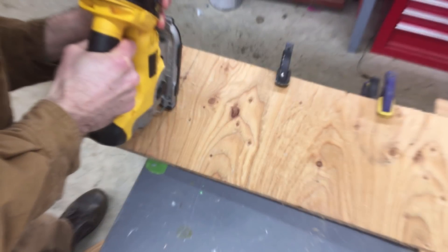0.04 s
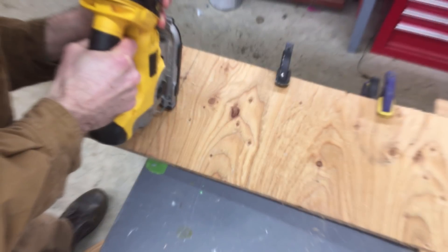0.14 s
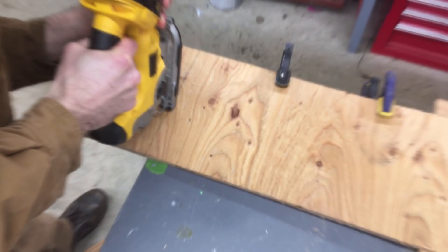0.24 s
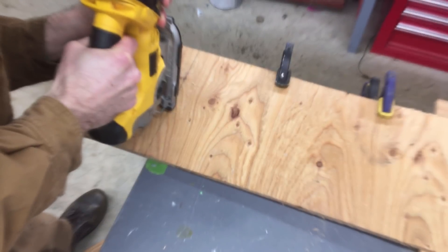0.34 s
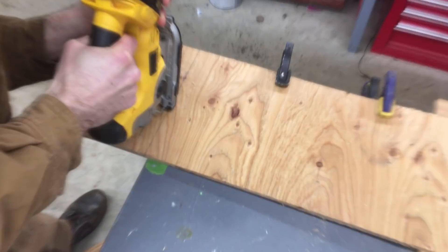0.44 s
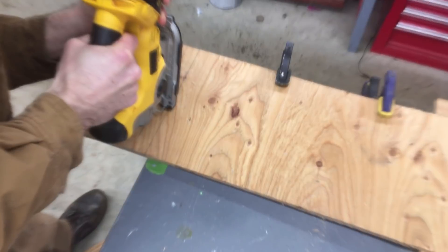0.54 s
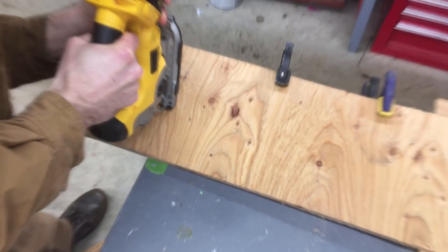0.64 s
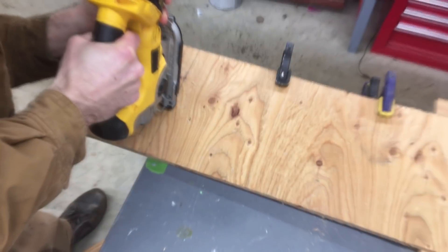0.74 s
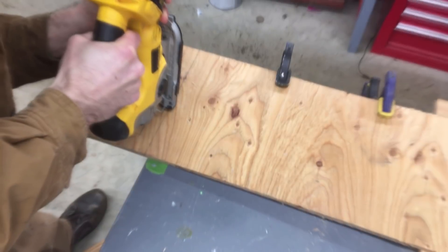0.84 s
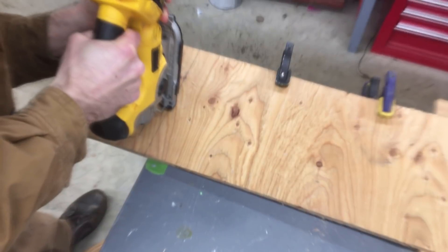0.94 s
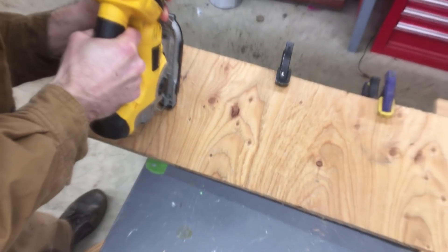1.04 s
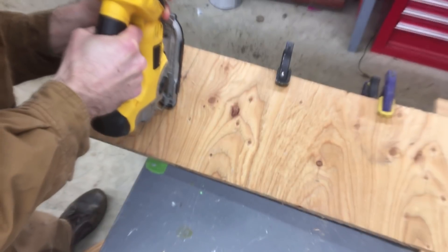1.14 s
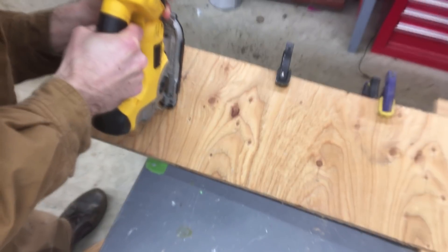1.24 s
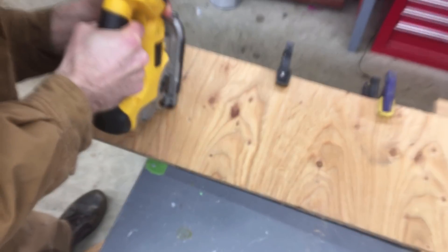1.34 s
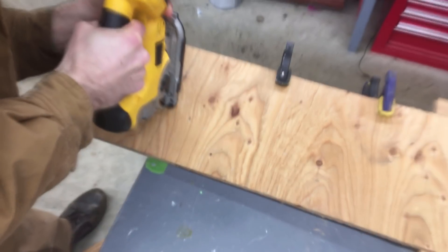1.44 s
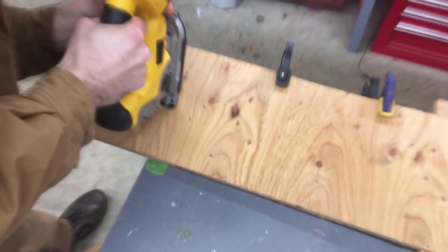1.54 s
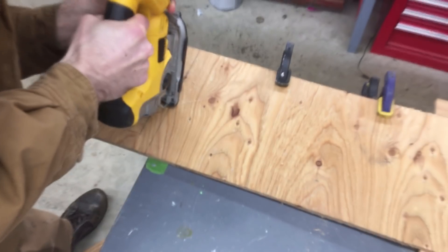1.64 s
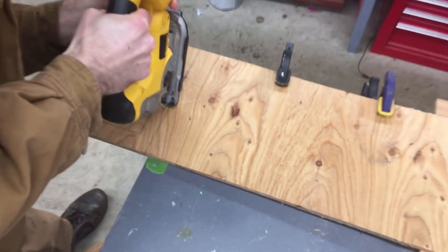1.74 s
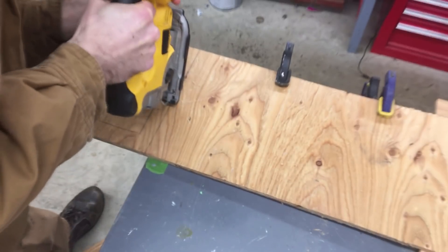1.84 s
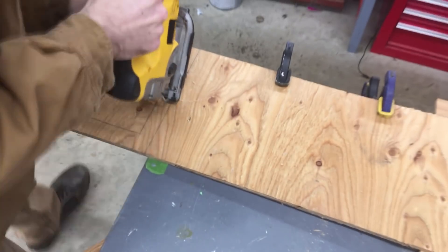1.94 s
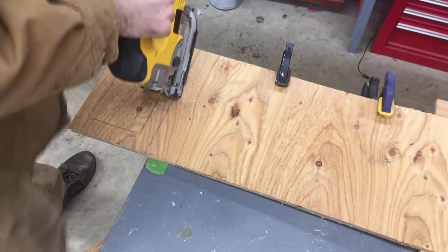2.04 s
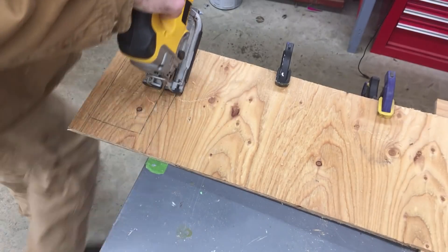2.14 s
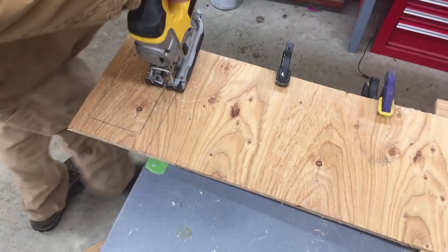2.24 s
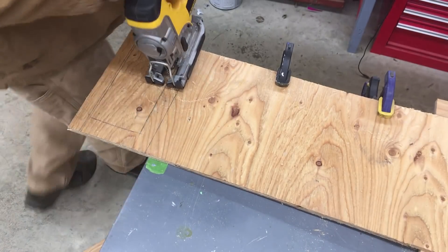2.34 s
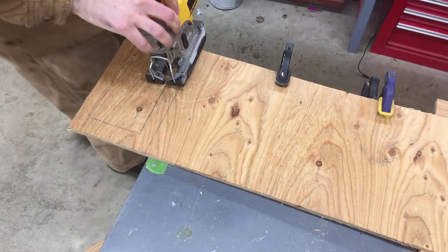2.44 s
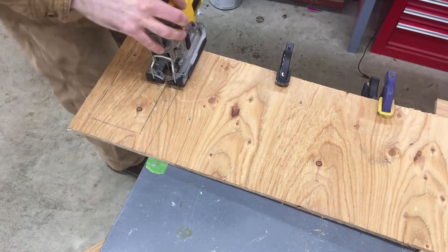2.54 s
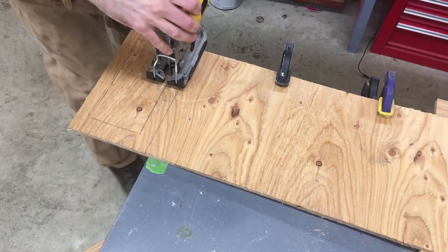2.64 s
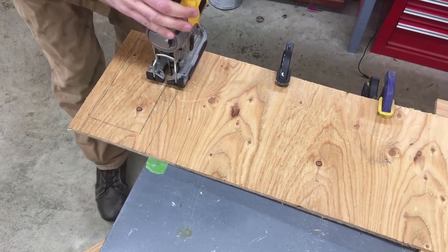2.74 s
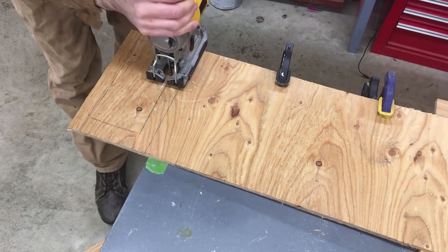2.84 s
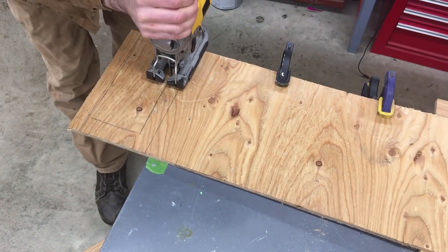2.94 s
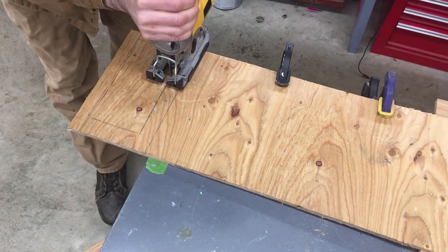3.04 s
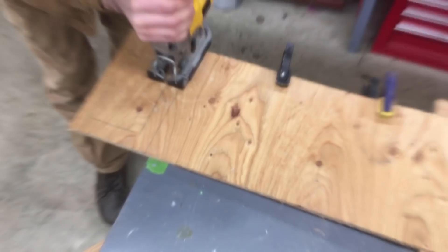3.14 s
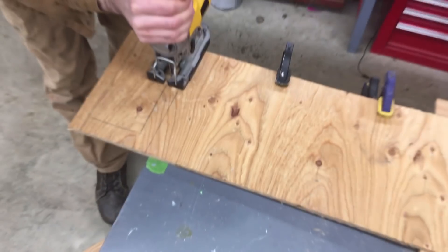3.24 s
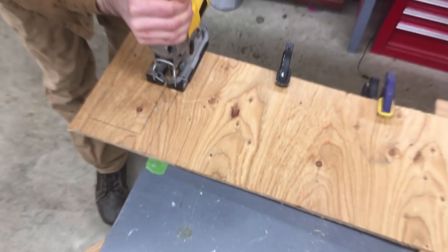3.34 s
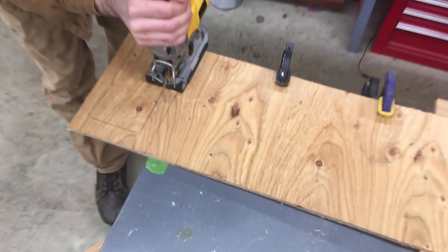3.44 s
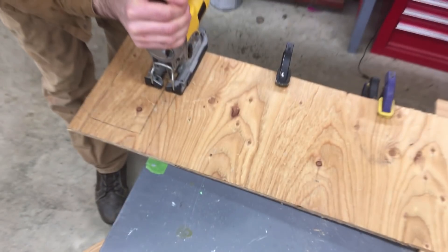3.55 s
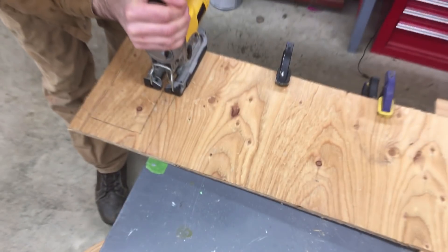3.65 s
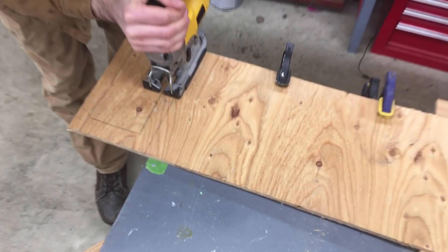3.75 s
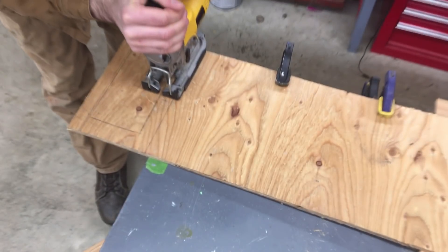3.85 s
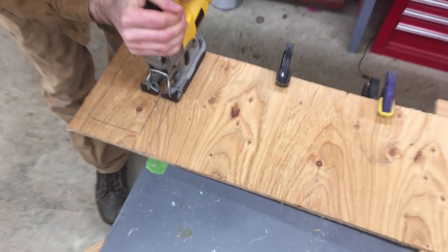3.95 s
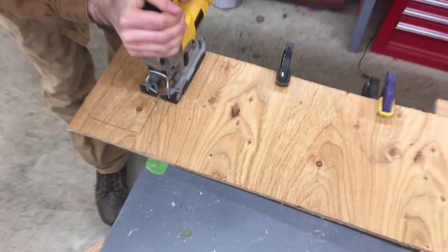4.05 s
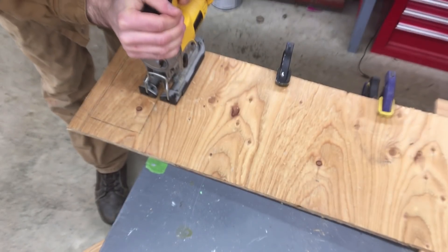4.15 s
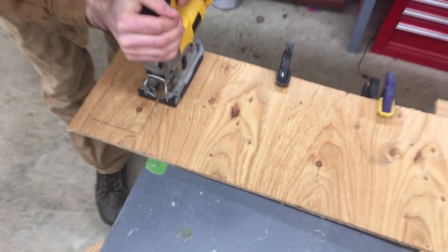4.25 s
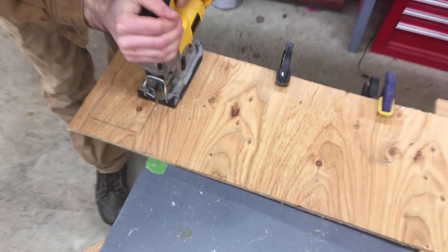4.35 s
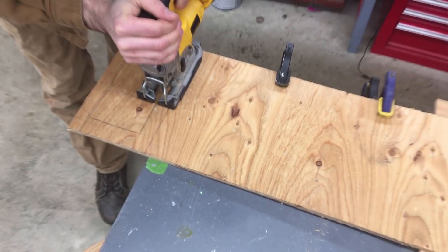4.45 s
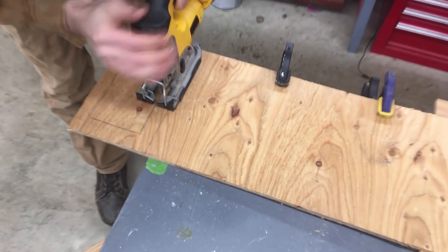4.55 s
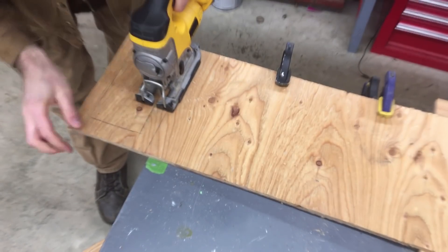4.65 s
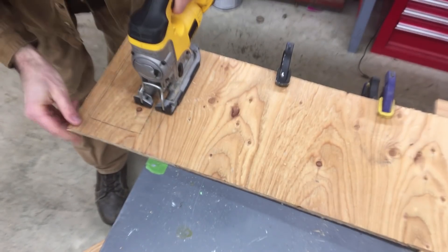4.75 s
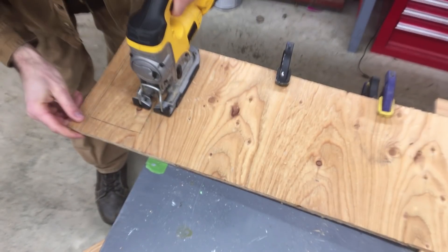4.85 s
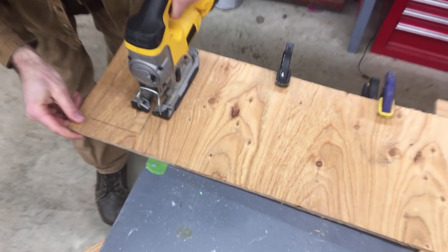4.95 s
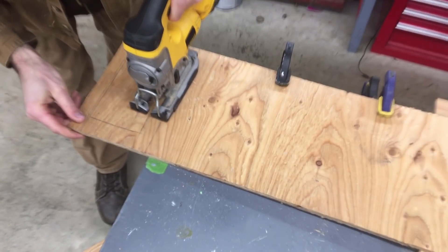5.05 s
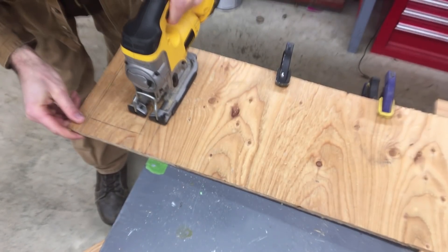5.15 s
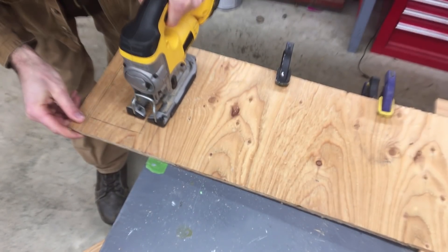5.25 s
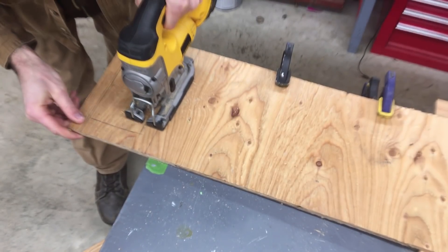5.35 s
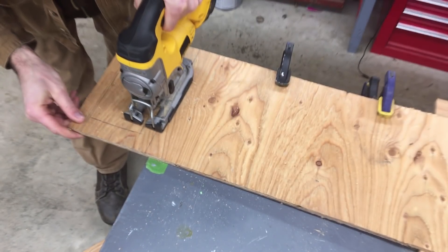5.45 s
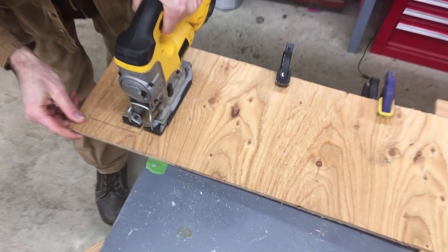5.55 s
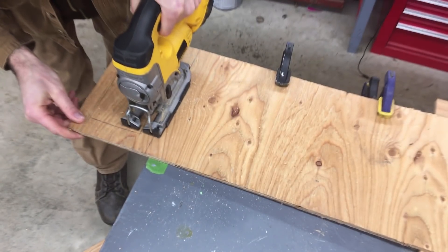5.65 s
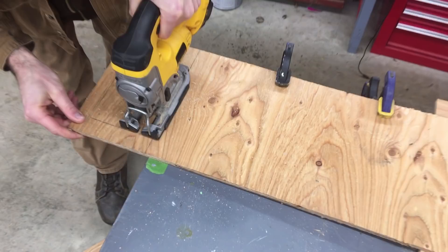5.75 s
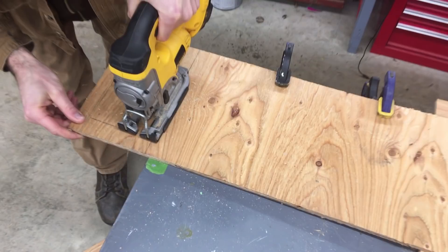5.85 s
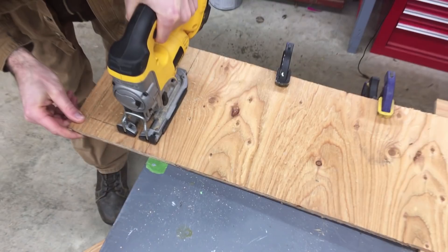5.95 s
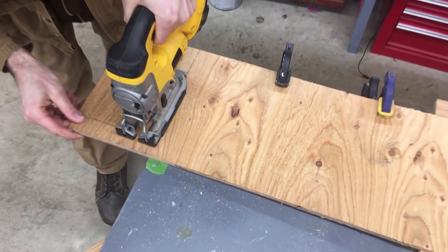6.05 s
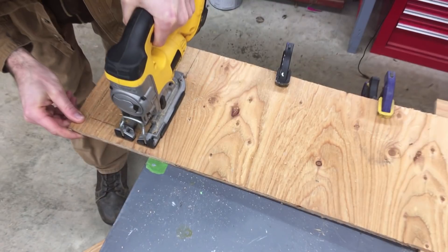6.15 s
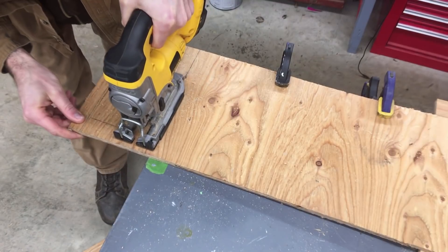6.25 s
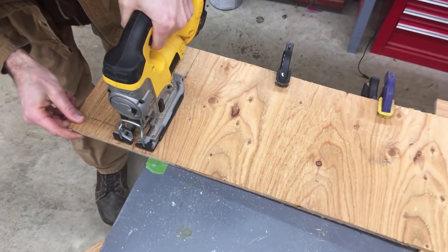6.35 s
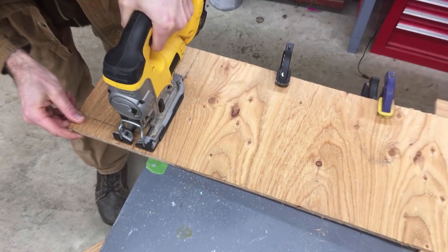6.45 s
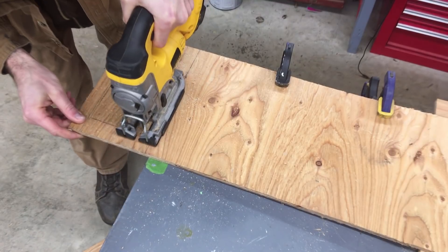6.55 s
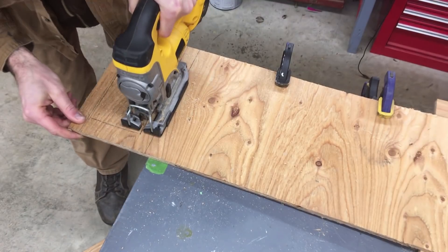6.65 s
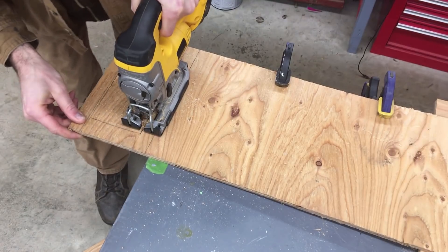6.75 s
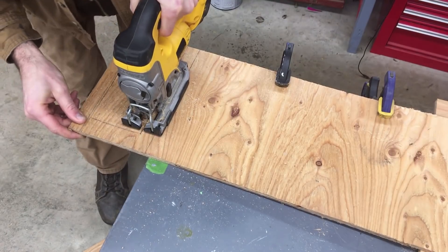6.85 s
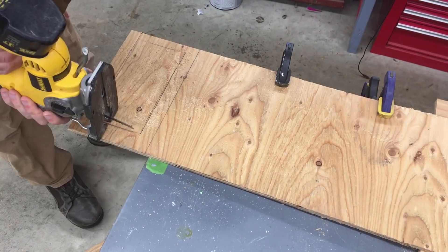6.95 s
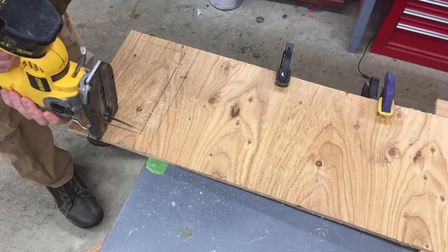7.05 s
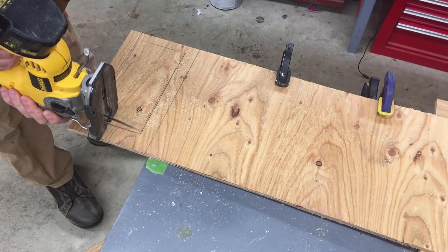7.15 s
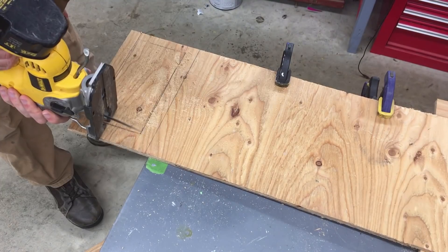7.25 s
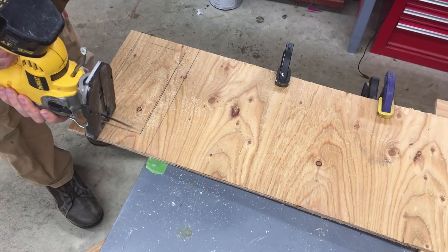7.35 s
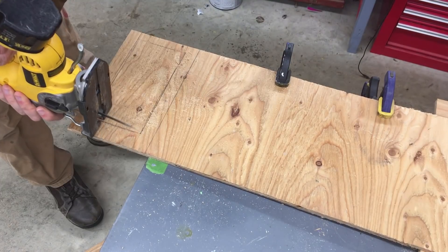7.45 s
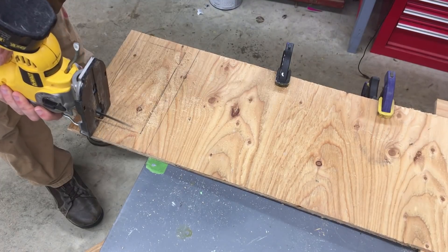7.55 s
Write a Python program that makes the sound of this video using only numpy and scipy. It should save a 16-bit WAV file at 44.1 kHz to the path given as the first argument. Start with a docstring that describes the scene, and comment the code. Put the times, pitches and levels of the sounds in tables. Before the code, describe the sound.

A cordless jigsaw buzzes through clamped plywood in two runs, with knocks and shuffling between, then whirs briefly in the air in a workshop.

```python
"""In a workshop a cordless jigsaw makes three short runs, two of them through a clamped plywood board.
Harmonics of the stroke rate make the hum; bursts of grainy noise make the teeth biting the wood.
Stroke jolts and teeth drive resonators, the ringing parts; shaped noise makes gears and fan whirr on.
Between the runs the saw is shifted on the board: decaying rings make ticks and knocks, noise the rustle.
Decaying bands of noise give the room's echo."""
import sys
import numpy as np
from scipy import signal
from scipy.fft import rfft, irfft
from scipy.io import wavfile
from scipy.ndimage import uniform_filter1d

SR = 44100
rng = np.random.default_rng(int(sys.argv[2]) if len(sys.argv) > 2 else 0)


def volts_from_decibels(level):
    """Turn decibel levels (scalar or array-like) into linear amplitude factors."""
    exponent = np.asarray(level, float) / 20
    return 10 ** exponent


def transcribe(u):
    """Save the signal u as a 16-bit wav file named by the first command-line argument.

    u: samples, shape (n,) or (channels, n), limited to [-1, 1]; the rate is SR.
    q: integer samples, one column per channel.
    """
    v = np.clip(np.atleast_2d(u).T, -1, 1)
    q = np.round(v * 32767).astype(np.int16)
    wavfile.write(sys.argv[1], SR, q)


N = 335160


def rms_one(x):
    """Normalisation: equal mean power, whatever the waveform."""
    return x / np.sqrt(np.mean(x ** 2) + 1e-20)


def in_time(rows):
    """Envelopes: each column is interpolated linearly over the t/s of the first."""
    s, *columns = np.transpose(rows)
    return [np.interp(np.arange(N) / SR, s, c) for c in columns]


def at_hz(points, hz):
    """Spectral interpolation: straight lines over the logarithm of frequency."""
    f, value = np.transpose(points)
    return np.interp(np.log(hz), np.log(f), value)


def drift(rate):
    """Random modulation: chance values, rate per second, joined by lines; spread about 1."""
    count = int(N * rate // SR) + 2
    values = rms_one(rng.standard_normal(count)) * np.sqrt(3 / 2)   # the lines lose a third of the power
    return np.interp(np.arange(N) * (rate / SR), np.arange(count), values)


def coloured(x, spectrum):
    """Spectral shaping: weights x by level over frequency, then sets its rms to 1."""
    hz = np.maximum(np.fft.rfftfreq(N, 1 / SR), 10)
    return rms_one(irfft(rfft(x) * volts_from_decibels(at_hz(spectrum, hz)), N))


def bandpass(x, low, high):
    """Band limitation: passes what lies between two frequencies."""
    return signal.sosfilt(signal.butter(2, [low, high], "band", fs=SR, output="sos"), x)


def resonance(x, hz, width_hz):
    """Damped resonance: one pole pair, whose bandwidth sets the decay."""
    r = np.exp(-np.pi * width_hz / SR)
    a = [1, -2 * r * np.cos(2 * np.pi * hz / SR), r * r]
    return signal.lfilter([(1 - r * r) / 2, 0, (r * r - 1) / 2], a, x)


def switched(spans, start_s, stop_s):
    """Gating: 1 inside the spans, with a ramp at either end, but none at a start at 0."""
    t = np.arange(N) / SR
    ramps = [np.minimum((t - a) / start_s + (a == 0), (b - t) / stop_s + 1) for a, b in spans]
    return sum(np.clip(ramp, 0, 1) for ramp in ramps)


def peak(at_s, rise_s, fall_s):
    """Triangular envelope: from 0 up to 1 at the given moment, and down to 0."""
    return np.interp(np.arange(N) / SR, [at_s - abs(rise_s), at_s, at_s + abs(fall_s)], [0, 1, 0])


def swell(at_s, db, rise_s, fall_s):
    """Exponential growth and decay: the gain climbs 40 dB to its peak and falls away again."""
    tent = peak(at_s, rise_s, fall_s)
    return volts_from_decibels(db + 40 * (tent - 1)) * (tent > 0)


# reverberation time of the workshop: f/Hz, time to fall 60 dB/s
REVERBERATION = [(100, 1), (1000, 0.59), (1900, 0.39), (3800, 0.45), (6000, 0.45), (14000, 0.23)]


def workshop(x):
    """Diffuse reverberation: half-octave bands of noise, each dying at its own rate."""
    t, edges = np.arange(SR) / SR, 60 * 2.0 ** np.arange(0, 8.1, .5)
    tail = 0
    for low, high in zip(edges, edges[1:]):
        band = bandpass(rng.standard_normal(SR), low, high)
        t60 = at_hz(REVERBERATION, np.sqrt(low * high))
        decay = volts_from_decibels(-60 * t / t60) * np.minimum(t / 0.007, 1)
        tail = tail + band * decay / np.sqrt(np.sum(decay ** 2))
    return signal.fftconvolve(x, tail)[:N]


# level of the rustle in the pauses, before its flutter: t/s, level/dB
RUSTLE_LEVEL = [(2.16, -69), (2.225, -69.5), (2.28, -78), (2.394, -74.5), (2.416, -74.5), (2.71, -78.5),
                (2.735, -75), (2.78, -83), (2.83, -76), (2.9, -84.5), (3.05, -90.5), (6.78, -85),
                (6.97, -98)]
# spectrum of the rustle: f/Hz, level per Hz/dB
RUSTLE_SPECTRUM = [(290, -17.5), (863, -1), (2360, -1.5), (5830, -7), (13200, -15.5), (15500, -22.5)]
# the saw is dragged over the wood: t/s, rumble level/dB, rub level/dB, fall of the rumble/s
DRAGS_ON_WOOD = [(2.222, -71, -76, 0.28), (2.5, -75, -77, 0.61)]
DRAG_RISE_S, RUB_FALL_S, RUMBLE_FLOOR_DB = 0.23, 0.26, -85


def shuffle():
    """Friction noise: lumpy rumble, dull rubbing and grainy rustle of hands, feet and shoe on wood."""
    rumble_gain = volts_from_decibels(RUMBLE_FLOOR_DB)
    rumble_gain = rumble_gain + sum(swell(s, db, DRAG_RISE_S, fall) for s, db, _, fall in DRAGS_ON_WOOD)
    rub_gain = sum(swell(s, db, DRAG_RISE_S, RUB_FALL_S) for s, _, db, _ in DRAGS_ON_WOOD)
    rumble = bandpass(rng.standard_normal(N), 80, 260)
    rub = bandpass(rng.standard_normal(N), 300, 720)
    grains = rng.standard_normal(N) * volts_from_decibels(2.1 * rng.exponential(1, N))
    rustle = coloured(grains, RUSTLE_SPECTRUM)
    dull = rumble_gain * rms_one(rumble) + rub_gain * rms_one(rub)
    rustle_gain = volts_from_decibels(in_time(RUSTLE_LEVEL)[0] + 2.3 * drift(30.27))
    return volts_from_decibels(2.7 * drift(32)) * dull + rustle_gain * rustle


# ticks and knocks of the handled saw: t/s, tick level/dB, low knock level/dB, main ring f/Hz, ring width/Hz
HANDLING_TAPS = [(2.212, -54, -64, 3401, 700), (2.417, -50, -82, 3900, 300),
                 (2.418, -49.5, -97.5, 5000, 350), (2.447, -53, -71.5, 2330, 1200),
                 (2.5, -61, -69.5, 1330, 300), (2.529, -59, -67.5, 520, 150), (2.586, -54, -82, 4500, 3000),
                 (2.625, -62, -75, 2190, 300), (2.725, -57, -79, 6300, 1300), (2.797, -57, -83, 3300, 700),
                 (2.826, -61.5, -76, 6600, 700), (2.854, -61, -71, 3480, 1500), (2.96, -65, -88, 2100, 600),
                 (3.111, -19.5, -47, 1320, 100), (6.59, -31, -65, 848, 250), (6.806, -57, -84, 3273, 700),
                 (6.981, -63.5, -86, 1500, 500), (7.054, -36, -75, 1520, 50), (7.079, -29, -78, 3748, 250)]
# modes of the knocked board: f/Hz, level against the knock/dB, time to fall 60 dB/s
BOARD_MODES = [(119, -4.5, 0.51), (224, -1, 0.12), (336, -4, 0.14), (506, -8, 0.14)]
CRACK_FALL_S, KNOCK_RISE_S = 0.0037, 0.0033


def taps():
    """Impact excitation: a short dry crack, a ring at its own pitch, and a soft push into the board."""
    out, t = np.zeros(N), np.arange(SR // 4) / SR
    noises = rng.standard_normal((len(HANDLING_TAPS), len(t)))
    for (s, tick_db, knock_db, ring_hz, width_hz), noise in zip(HANDLING_TAPS, noises):
        crack = noise * np.exp(-t / CRACK_FALL_S)
        ring = resonance(crack, ring_hz, width_hz)
        tick = 0.2 * resonance(crack, 1.8 * ring_hz, 2.1 * ring_hz) + 0.65 * ring / np.abs(ring).max()
        knock = 0
        for k, (hz, db, t60) in enumerate(BOARD_MODES):
            knock = knock + volts_from_decibels(db - 60 * t / t60) * np.sin(2 * np.pi * hz * t + noise[k])
        knock = knock * (1 - np.exp(-t / KNOCK_RISE_S))
        at = round(s * SR)
        out[at:at + len(t)] += (volts_from_decibels(tick_db) * tick + volts_from_decibels(knock_db) * knock)[:N - at]
    return out


# soft starts: t of the trigger/s, time until the drive takes hold/s
SOFT_STARTS = [(3.062, 0.057), (6.989, 0.027)]
# stops: t at rest/s, braking time/s
BRAKED_STOPS = [(1.94, 0.0068), (6.64, 0.049)]
CREEP_FROM_DB, CREEP_TO_DB, BRAKE_DB = -15, -4.5, -11.5


def trigger():
    """Motor transients: dB lost in a start's creep, which ends in a jump, and in braking."""
    t = np.arange(N) / SR
    creep = sum(np.interp(t, [s, s + hold], [CREEP_FROM_DB, CREEP_TO_DB], 0, 0) for s, hold in SOFT_STARTS)
    return creep + BRAKE_DB * sum(peak(s, braking, .3) for s, braking in BRAKED_STOPS)


# the runs, while the trigger is held: from t/s, to t/s
TRIGGER_HELD = [(0, 1.94), (3.06, 6.64), (6.991, 7.6)]
# first harmonic of the hum, against the hum level: t/s, level/dB
FIRST_HARMONIC = [(0, -14.5), (1.63, -17), (1.68, -22), (1.92, -10), (3.2, -13.5), (4.9, -11.5),
                  (6.2, -23.5), (6.4, -9.5), (7.15, -18), (7.6, -18)]
HIGHER_DB = [-56.5, -52, -65]   # base level of the higher harmonics in each run
HIGHER_FOLLOWS, HUM_REF_DB, RATTLE_LIFT_DB = 0.32, -54, 5   # share of the hum's swing about the reference


def hum_levels(hum_db, lead_db, rattle):
    """Power sum: third and fourth harmonics share the hum level; also dB of the first and the higher."""
    run = np.searchsorted([a for a, b in TRIGGER_HELD], np.arange(N) / SR, "right") - 1
    higher_db = np.take(HIGHER_DB, run) + HIGHER_FOLLOWS * (hum_db - HUM_REF_DB)
    higher_db = higher_db + RATTLE_LIFT_DB * rattle + trigger()
    third_db = hum_db - 10 * np.log10(1 + volts_from_decibels(-2 * lead_db))
    return hum_db + in_time(FIRST_HARMONIC)[0], third_db, third_db - lead_db, higher_db


# harmonics 5 to 14 of the hum, against the higher-harmonic level: level/dB each;
# one row for the first cut, one for all that follows
UPPER_HARMONICS = [
    [-9.5, -7, -5, -8.5, -13, -8, -15, -10.5, -17.5, -6],
    [-20.5, -19.5, -13.5, -20.5, -10.5, -15.5, -24, -7.5, -10.5, -9],
]
# the fifth harmonic swells as the blade first bites: t/s, lift/dB, rise/s, fall/s
FIFTH_LIFT = (3.27, 14, 0.14, 0.46)
# motor shaft, before its waver: t/s, tone level/dB, octave level/dB
SHAFT_TONES = [(1.9, -74.5, -68.5), (3.1, -83, -78.5), (3.3, -75, -57), (4.7, -69.5, -58), (5.3, -64, -63),
               (6.2, -59, -62), (6.44, -52.5, -55), (6.52, -55, -81), (7.05, -85, -80), (7.075, -75, -51),
               (7.12, -61.5, -60), (7.36, -69, -59), (7.42, -60, -78), (7.6, -66, -81)]
# thin high whine, before its waver: t/s, level/dB
WHINE_LEVEL = [(1.9, -83), (3.1, -73), (4.8, -57), (6.4, -66), (7.1, -64.5)]
SHAFT_TURNS, WHINE_ORDER = 7.11, 27   # motor turns per stroke; whine cycles per motor turn


def hum(turns, rattle, first_db, third_db, fourth_db, higher_db):
    """Harmonic series: the board hums at multiples of the stroke rate, each wavering; shaft tones join."""
    second_cut = np.arange(N) > 2.5 * SR
    higher = [higher_db + np.where(second_cut, b, a) + 2.0 * drift(5) for a, b in zip(*UPPER_HARMONICS)]
    s, lift_db, rise, fall = FIFTH_LIFT
    higher[0] = higher[0] + lift_db * peak(s, rise, fall)
    out = 0
    for k, db in enumerate([first_db, first_db + 0.5, third_db, fourth_db] + higher, 1):
        waver = 0.42 * drift(9) + 2.0 * rattle * drift(40)
        tone = np.sin(2 * np.pi * (k * turns + rng.random()) + waver)
        out = out + volts_from_decibels(db + 2.07 * drift(16)) * tone
    shaft_phase = 2 * np.pi * SHAFT_TURNS * turns
    whine = np.sin(WHINE_ORDER * shaft_phase + 1.2 * drift(250))
    out = out + volts_from_decibels(in_time(WHINE_LEVEL)[0] + 2.5 * drift(15)) * whine
    tone_db, octave_db = in_time(SHAFT_TONES)
    shaft = shaft_phase + 3.9 * rattle * drift(40)
    out = out + volts_from_decibels(tone_db + 1.2 * drift(12)) * np.sin(shaft)
    out = out + volts_from_decibels(octave_db + 1.7 * drift(14)) * np.sin(2 * shaft)
    return np.sqrt(2) * out   # sines of rms 1


BITE_AT = 0.22   # share of the stroke at which the bite peaks


def strokes(turns, load):
    """Periodic excitation: a jolt per turn, and bursts of teeth, strong on the cut, faint on the return."""
    count, phase = turns.astype(int), turns % 1
    strength = volts_from_decibels(1.2 * rng.standard_normal(count[-1] + 1))[count]
    bite = (phase / BITE_AT * np.exp(1 - phase / BITE_AT)) ** 4.05
    burst = bite + 0.3 * np.exp(-((phase - .56) / 0.11) ** 2)
    gate = 1 - load + load * strength * rms_one(burst)
    gate = gate / np.sqrt(uniform_filter1d(gate ** 2, size=4000))   # steady power from stroke to stroke
    jolts = np.diff((turns - .12).astype(int), prepend=0) * strength   # just after the teeth meet the wood
    chips = rms_one(volts_from_decibels(2.03 * rng.exponential(1, N)))

    def teeth():
        """Stochastic excitation: each call draws fresh grainy noise under the same bursts."""
        return gate * chips * rng.standard_normal(N)
    return rms_one(jolts), teeth, gate


# spectrum of the teeth in the wood: f/Hz, level per Hz/dB
TEETH_SPECTRUM = [(200, -39), (500, -10), (900, -1.5), (1500, -0.5), (2900, 1.5), (5000, -5), (9000, -6.5),
                  (13500, -8), (15700, -11.5)]
# spectrum of gears and fan: f/Hz, level per Hz/dB
FAN_SPECTRUM = [(200, -20), (700, -28.5), (2300, -1.5), (4300, -1), (9000, -4), (12700, -7), (15700, -2)]
FAN_PULSE = 0.44   # how far gears and fan throb with the strokes


def whirr(whirr_db, higher_db, load, teeth, gate):
    """Broadband noise: load trades gears and fan for teeth in the wood; a low rumble lies beneath."""
    cutting = load * coloured(teeth(), TEETH_SPECTRUM)
    fan = coloured(gate ** FAN_PULSE * rng.standard_normal(N), FAN_SPECTRUM)
    rumble = bandpass(teeth(), 210, 950)
    noise = cutting + np.sqrt(1 - load) * fan
    return volts_from_decibels(whirr_db + 5 + 0.92 * drift(20)) * noise + volts_from_decibels(higher_db - 12) * rms_one(rumble)


# spells of chatter on the board: t/s, half length/s, level/dB for a part with a share of 1
CHATTER_SPELLS = [(1.85, 0.29, 5), (3.538, 0.19, 6.5)]
# modes of each part (f/Hz, width/Hz, level within the part/dB), and the share 0-1 of its drive's power
# that repeats at each stroke when strokes are wholly even; the first mode always rings, the others under load.
# In order: board under the shoe, shoe, shoe edge, blade guide, plunger, blade, blade clamp, heel of the
# shoe, gear housing, motor housing, blade's first, second and third high ring, fan vents
PART_MODES = [([(1392, 27, 4.5), (1243, 49, 5)], 1), ([(1739, 132, 3), (1980, 34, 10.5), (2136, 69, 6.5)],
              0.28), ([(2411, 54, 10), (2626, 41, 8)], 0.99), ([(3190, 600, -2), (3490, 190, 9)], .75),
              ([(4127, 190, 5.5), (4520, 250, 1.5)], 0.4), ([(6510, 630, 5.5), (6060, 800, 14)], 0.068),
              ([(4960, 640, 0)], 0.2), ([(1614, 130, 0)], 0.87), ([(3796, 210, 0)], 0.5), ([(2225, 150, 0)],
              0.3), ([(10960, 430, 0)], 0.1), ([(11600, 800, 0)], 0.1), ([(13500, 900, 0)], 0.1),
              ([(14900, 1600, 0)], 0.1)]
# for each part: share of the chatter, level in the air over the reference/dB,
# and on the board (t/s, level over the reference/dB)
PART_LEVELS = [(.3, -21, [(0.15, -8), (.35, -2), (.72, -0.5), (1.55, 0), (1.68, -12.5), (3.105, -1),
               (3.12, 9.5), (3.15, -4), (3.6, -5), (5.1, -10.5), (6.0, -7), (6.6, -3.5)]),
               (1.18, -27, [(0, -11), (1.6, -6), (3.3, -10), (3.8, 3), (5.4, -8.5), (6.1, -0.5),
               (6.4, -6.5), (6.6, -10)]), (.05, -28, [(0.1, -11), (.35, -17), (1.2, -10.5), (1.45, -4),
               (1.7, -16), (3.3, -10), (3.9, -4), (4.25, 3.5), (4.6, -1.5), (4.75, -3), (5.5, -15.5),
               (6.33, -2), (6.6, -12)]), (0.41, -24, [(0.6, -3), (1.6, -3.5), (3.15, 0), (3.33, -3),
               (3.5, -3.5), (4.5, -1), (4.75, -5.5), (6.4, -4.5)]), (0.53, -17, [(0, -13.5), (1.9, -6.5),
               (3.36, -11.5), (3.45, -1), (4.3, -12), (4.9, -23), (5.05, 1.5), (5.2, -9), (5.4, 1),
               (5.75, -3), (6.3, -6.5), (6.6, -16)]), (.2, -27, [(0, -15.5), (5.1, -6.5), (5.6, -2),
               (6.1, -5.5), (6.4, -11.5)]), (0, -29, [(0, -9), (1.9, -8.5), (3.3, -10), (4.5, -2),
               (5.0, -4.5), (6.4, -8.5)]), (0.86, -41, [(.1, -3.5), (.22, -9), (.42, -2.5), (.75, -2.5),
               (1.6, -9), (3.3, -5.5), (5.4, -7), (6.0, -2.5), (6.5, -9)]), (0.26, -1, [(1.65, -7),
               (1.88, -2.5), (3.3, -7), (4.5, -6), (5.05, -1), (5.4, -2), (5.7, -9), (6.5, -9)]),
               (0, -12.5, [(4.4, -6.5), (6.6, -18)]), (0.25, -13, [(3.25, -24), (3.42, -4), (3.7, -20)]),
               (0, -10, [(3.7, -21), (4.2, -3), (4.4, -26), (5.25, -13), (5.6, -20)]),
               (0.042, -8, [(1.9, -11), (3.1, -24)]), (0, -8.5, [(0, -29.5)])]
LIFTED_S = 6.8   # from here on the saw is in the air


def ringing(whirr_db, load, repeating, jolts, teeth):
    """Modal resonance: jolts and tooth noise set each part ringing at its own frequencies."""
    lifted = np.arange(N) > LIFTED_S * SR
    chatter_db = sum(db * np.sin(np.pi / 2 * peak(s, half, half)) for s, half, db in CHATTER_SPELLS)
    out = 0
    for (modes, repeats), (chatters, air_db, on_board) in zip(PART_MODES, PART_LEVELS):
        board_db = in_time(on_board)[0] + chatters * chatter_db
        db = whirr_db + np.where(lifted, air_db, board_db)
        share = np.clip(repeats * repeating, 0, 1)
        drive = np.sqrt(share) * jolts + np.sqrt(1 - share) * teeth()
        part = 0
        for k, (hz, width, mode_db) in enumerate(modes):
            mode = resonance(drive * load ** (k > 0), hz, width)
            part = part + (-1) ** k * volts_from_decibels(mode_db + 1.1 * drift(5)) * mode
        centre_hz = np.mean(modes, axis=0)[0]
        out = out + volts_from_decibels(db + 1.0 * drift(20)) * rms_one(resonance(part, centre_hz, 1400))
    return out


# the blade sings: t of the peak/s, level/dB, rise/s, fall/s
BLADE_SONGS = [(5.33, -47, 0.58, 0.15), (6.75, -75, 0.25, 0.16)]


def squeak(teeth):
    """Sharp resonance: tooth noise through two equal narrow resonators makes the blade sing."""
    hz, width_hz = 8750, 150
    song = rms_one(resonance(resonance(teeth(), hz, width_hz), hz, width_hz))
    return sum(swell(*row) for row in BLADE_SONGS) * song


# the drive: t/s, stroke rate f/Hz, board hum level/dB, lead of its third harmonic over the fourth/dB
STROKE_DRIVE = [(0.0, 78, -62.5, 7), (0.29, 80, -54.5, -15.5), (0.87, 76, -53, 2), (1.19, 79.7, -55, -5),
                (1.32, 77.5, -47.5, -9), (1.626, 73.7, -53, -5), (1.69, 78.4, -73, -2),
                (1.922, 75.5, -60, -7.5), (3.06, 58, -57, -2), (3.12, 56.2, -61, 10),
                (3.23, 74.5, -46.5, 12), (3.45, 76, -50, 14.5), (3.65, 73.5, -53, 6.5),
                (3.81, 75, -56.5, 2), (4.11, 76.4, -56, 17), (4.52, 77, -55, 2), (4.67, 75, -58, 10),
                (4.76, 76, -63.5, -15), (4.99, 73, -57, -16), (5.08, 73.8, -65, -7),
                (5.25, 75.2, -61.5, -23), (5.77, 75.5, -62, -14), (6.05, 73, -57.5, -13.5),
                (6.27, 75, -61, -16), (6.6, 78, -69, 2), (6.995, 42, -93, -4), (7.06, 51, -91, 6),
                (7.115, 76.5, -77, 20), (7.19, 81.3, -76, 15), (7.6, 77, -83, 7)]
# how the blade meets the wood: t/s, load 0-1, evenness 0-1;
# a loaded stroke comes as a burst, even strokes ring alike
BLADE_LOAD = [(0, 0.38, 0.7), (.3, 0.41, 0.93), (1.62, 0.56, 0.89), (1.75, 0.47, 0.3), (3.42, 0.55, 0.1),
              (4.15, 0.6, 0.8), (4.8, 0.66, 0.2), (5.4, 0.61, 0.1), (6.3, 0.49, 0.1), (7.0, 0.66, 0.2),
              (7.15, 0.32, 0.4)]
# reference level for whirr and ringing; the whirr plays 5 dB above: t/s, level/dB
WHIRR_REFERENCE = [(0, -42), (.36, -43.5), (1.614, -44), (1.648, -49.5), (1.728, -44.5), (1.928, -44.5),
                   (3.11, -45), (3.53, -44), (3.89, -46), (5.0, -45), (6.36, -44.5), (6.59, -51),
                   (7.018, -50.5), (7.102, -44.5), (7.6, -47)]
# the saw rattles, blurring its hum and making the strokes uneven: t/s, strength 0-1, settling time/s
RATTLE_SPELLS = [(3.1, 0.9, 0.19), (6.5, 1, 0.34), (7.08, 0.7, 0.11)]
RATTLE_RISE_S, RATTLE_ALWAYS = 0.081, 0.07


def saw():
    """Source and resonator: one stroke cycle drives hum, whirr and ringing while the trigger is held."""
    per_s, board_db, lead_db = in_time(STROKE_DRIVE)
    whirr_db = in_time(WHIRR_REFERENCE)[0] + trigger()
    spells = sum(x * peak(s, RATTLE_RISE_S, settle) for s, x, settle in RATTLE_SPELLS)
    rattle = np.clip(RATTLE_ALWAYS + spells, 0, 1)
    load, even = np.clip(in_time(BLADE_LOAD), 0, 1)
    hum_db = hum_levels(board_db, lead_db, rattle)
    turns = np.cumsum(per_s) / SR
    lifted = np.arange(N) > LIFTED_S * SR
    knock_turns = np.cumsum(per_s * (1 + lifted)) / SR   # in the air both reversals knock alike
    jolts, teeth, gate = strokes(knock_turns, load)
    bright = whirr(whirr_db, hum_db[-1], load, teeth, gate)
    bright = bright + ringing(whirr_db, load, even * (1 - rattle), jolts, teeth)
    held = switched(TRIGGER_HELD, start_s=0.017, stop_s=0.0082)
    low = held * hum(turns, rattle, *hum_db)
    return low, held * bright + squeak(teeth)   # the blade may sing on after the stop


ROOM_DB, CYCLES_PER_S = -5.5, 0.7   # echo gain; rate of the steady cycle between two noise tails


def scene():
    """Direct and diffuse field: near sounds plus an echo cycling between two tails for an even colour."""
    low, bright = saw()
    knocks = taps()
    sent = bright + 0.72 * low + 0.99 * knocks
    cycle = 2 * np.pi * CYCLES_PER_S * np.arange(N) / SR
    room = workshop(sent * np.cos(cycle)) + workshop(sent * np.sin(cycle))
    return (low + knocks + bright + volts_from_decibels(ROOM_DB) * room + shuffle())[None]


def low_pass(x):
    """Removes everything above the highest recorded frequency."""
    return signal.sosfilt(signal.butter(12, 16880, fs=SR, output="sos"), x)


def record(dry):
    """Transducer limits: the microphone drops the deepest bass and rounds the peaks; the top is cut."""
    x = signal.sosfilt(signal.butter(3, 55, "high", fs=SR, output="sos"), dry)
    x = .14 * np.tanh(x / .14)
    x = signal.sosfilt(signal.cheby2(20, 60, 16000, fs=SR, output="sos"), x)
    return low_pass(x)


dry = scene()
out = record(dry)
transcribe(out)
```